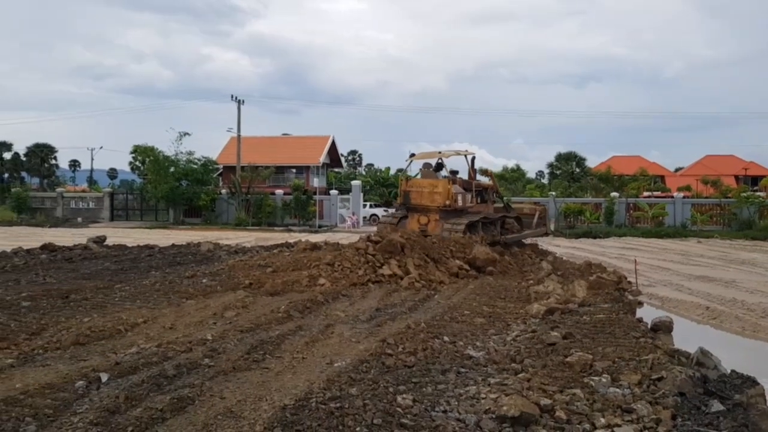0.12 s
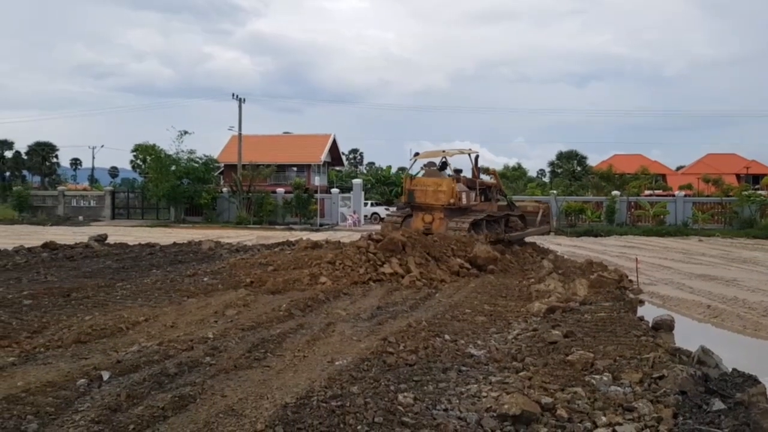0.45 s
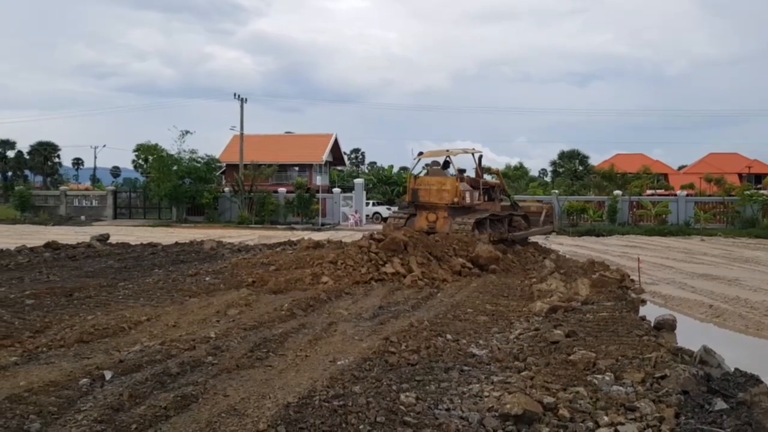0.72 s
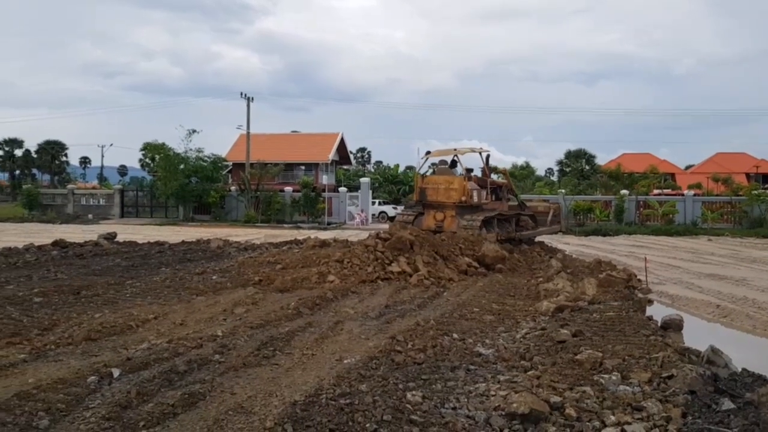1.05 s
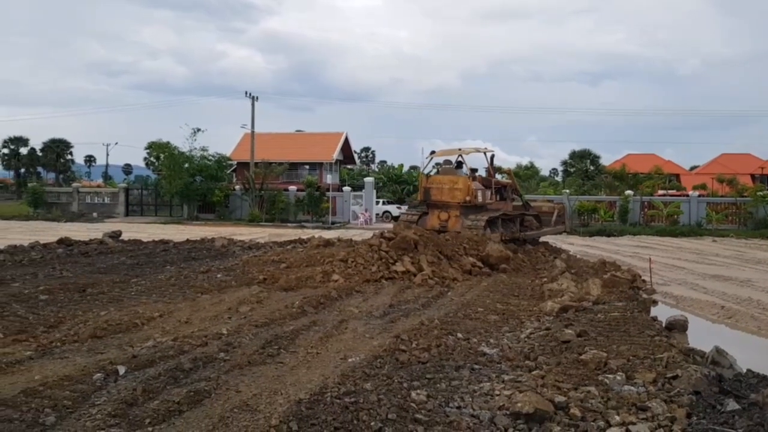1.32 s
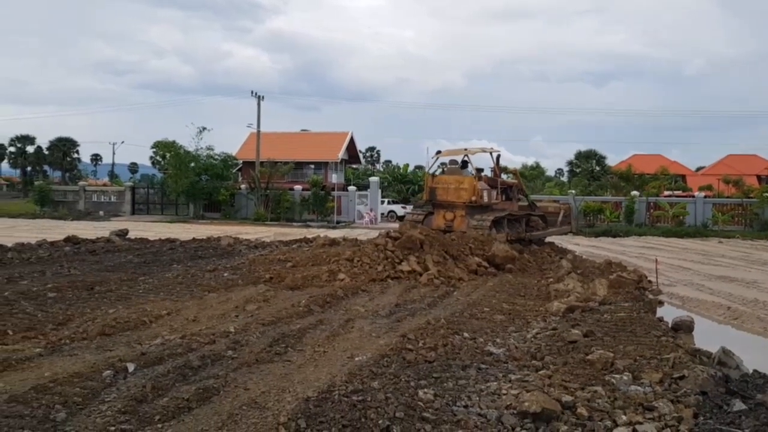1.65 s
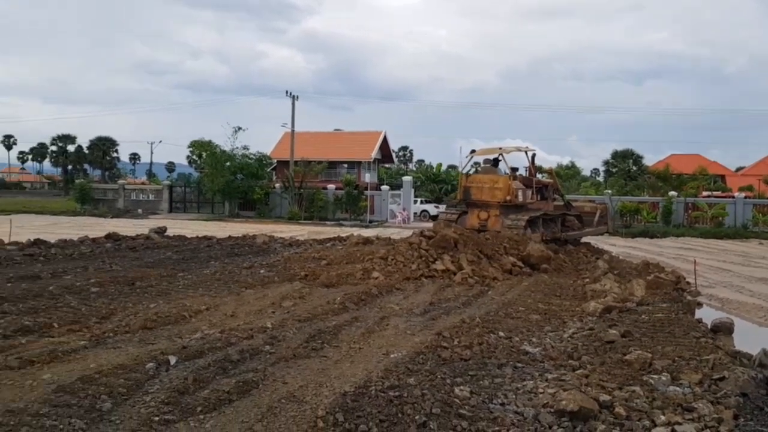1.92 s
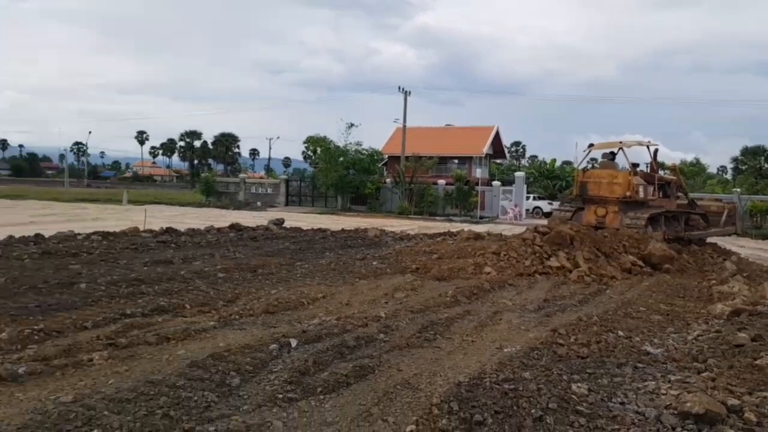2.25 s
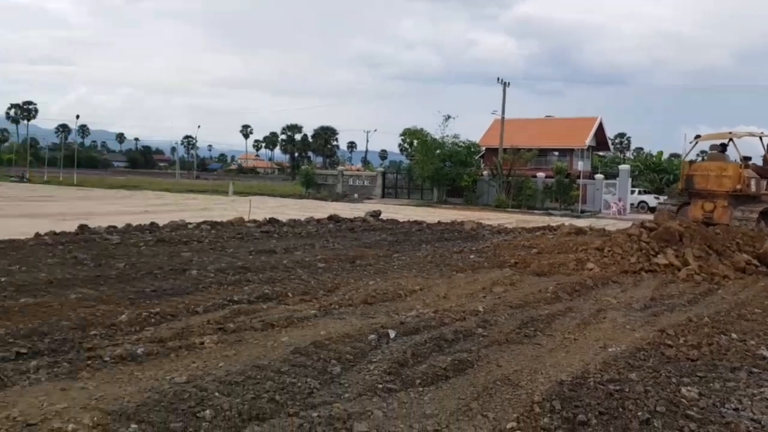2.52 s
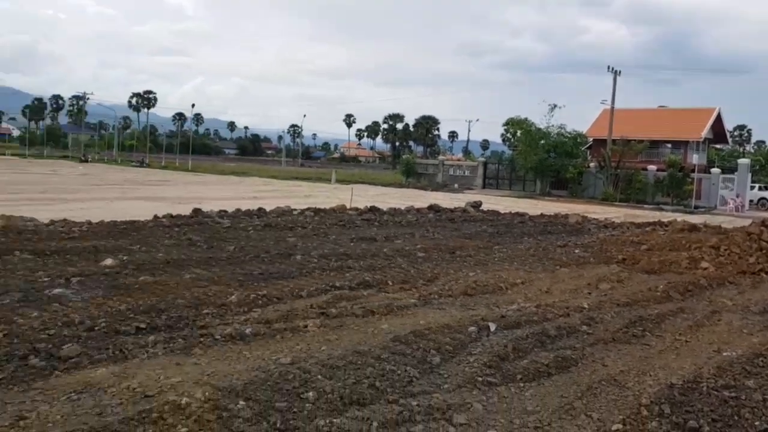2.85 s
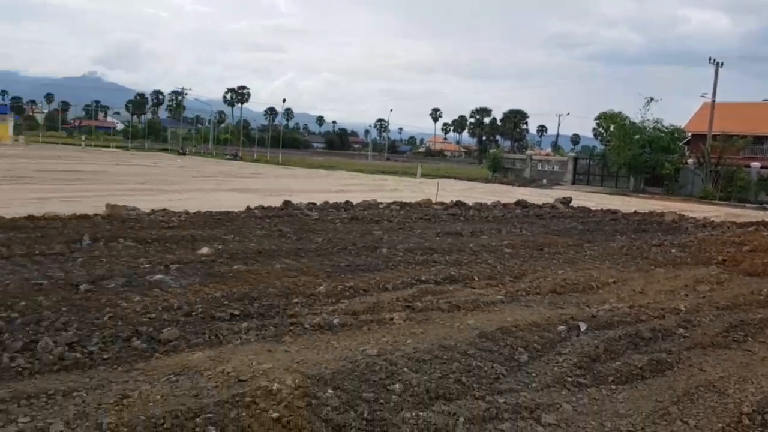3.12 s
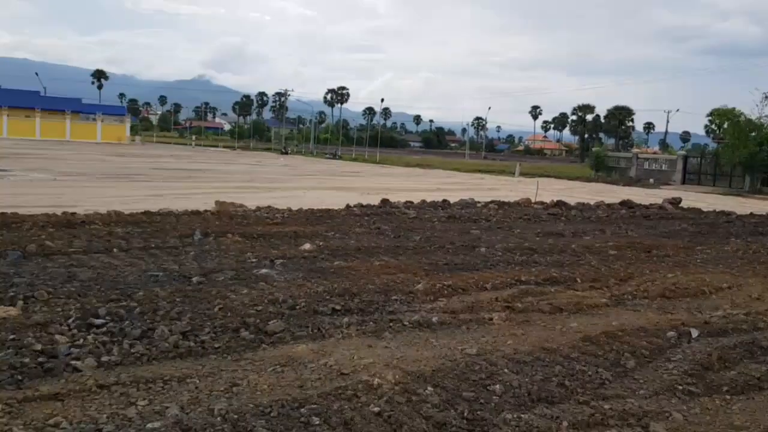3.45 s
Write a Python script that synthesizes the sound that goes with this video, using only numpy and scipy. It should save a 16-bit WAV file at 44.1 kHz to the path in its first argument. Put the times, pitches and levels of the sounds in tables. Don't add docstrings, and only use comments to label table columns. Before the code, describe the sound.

Steady low bulldozer engine throb with soft earth thuds, then a deeper, harder-working note with gear whine, hiss and small metallic ticks. Outdoors, dry, heard by a phone turning away, the stereo image shifting.

```python
import sys
import numpy as np
from scipy import signal
from scipy.fft import rfft, irfft, next_fast_len
from scipy.io import wavfile
from scipy.ndimage import uniform_filter1d, map_coordinates

SR = 44100
rng = np.random.default_rng(int(sys.argv[2]) if len(sys.argv) > 2 else 0)


def transcribe(signal):
    frames = np.atleast_2d(signal).T
    limited = np.clip(frames, -1, 1)
    pcm = np.round(limited * 32767).astype(np.int16)
    wavfile.write(sys.argv[1], SR, pcm)


def how_loud(loudness_db):
    steps = np.asarray(loudness_db, float) / 20
    return 10 ** steps


N = 157878

# time_s, firing_rate_hz
FIRING_RATE = [(0, 81.4), (.09, 80.6), (2.08, 80.6), (2.22, 78.9), (2.37, 73.9), (2.45, 73.3), (2.8, 72.9),
               (2.95, 73.4), (3.15, 76.6), (3.28, 77.3), (3.58, 77.2)]
# time_s, level_db
FUEL = [(0, -23), (.5, -26), (2.1, -24), (2.26, -22), (2.37, -17.5), (2.5, -17), (2.78, -18), (2.95, -16.5),
        (3.08, -20.5), (3.14, -24.5), (3.19, -21.5), (3.3, -24), (3.36, -18.5), (3.42, -21.5), (3.455, -28),
        (3.5, -21), (3.58, -21)]
# time_s, left_port_lag_ms
LEFT_LAG = [(0, 0.072), (.9, 0.078), (1.7, 0.091), (2.1, 0.14), (2.5, 0.25), (2.9, 0.34), (3.58, 0.41)]
# time_s, gain_db
RANGE_GAIN = [(0, 1), (.3, 2), (.8, 0.9), (1.4, -0.2), (2.1, 0.3), (2.5, 0.9), (3, 0.64), (3.58, -0.5)]
CYLINDER_EXCESS = [0.2, -0.4, -0.67, 0.48, 0.12, -0.2]
# cycle_order, level_db
EXHAUST_PIPE = [(1, -55), (3, -29), (4, -7), (5, 4.5), (6, 0), (7, -4.5), (11, -12.5), (12, -32),
                (14, -34.5), (30, -39)]
# cycle_order, facing_db, turned_db
GEAR_LINES = [(24.69, -51, -51.5), (50.16, -57.5, -48), (59.15, -55, -50), (70.56, -54.5, -58.5),
              (79.9, -54, -64)]
# freq_hz, level_db
ROAR_FACING = [(22, -31), (40, 1), (110, -5.5), (200, -6), (370, -8), (520, -5), (1200, -13.5),
               (1800, -12.5), (9000, -21.5)]
# freq_hz, level_db
ROAR_TURNED = [(22, -22), (40, 0), (110, 1.5), (200, -7.5), (330, -4.5), (800, -7.5), (1500, -13),
               (2400, -9.5), (4000, -20.5), (9000, -17.5)]
# centre_hz, width_hz, gain_db
PANELS_FACING = [(530, 53, 3), (1045, 200, 3.5), (1590, 150, 0.5), (1790, 69, -9.5), (1980, 46, 3),
                 (2160, 68, -6), (2410, 36, 6.5), (2598, 122, -7), (2740, 42, 3), (4640, 140, 3.5)]
# centre_hz, width_hz, gain_db
PANELS_TURNED = [(580, 62, 3), (1500, 120, 1), (2000, 71, -3.5), (2410, 180, -0.5), (2620, 73, -0.5),
                 (2990, 130, -1.5), (4020, 110, 0), (7780, 280, 0)]
# time_s, whistle_hz, level_db, hiss_share
TURBO_WHISTLE = [(0, 7030, -45, 0.33), (.5, 6790, -43, 0.11), (1.2, 6450, -45.5, 0.11),
                 (2.25, 6330, -47, 0.28), (2.4, 6790, -37.5, 1), (2.65, 7330, -44, .95),
                 (2.9, 7360, -41, .95), (3.2, 6940, -48, 0.83), (3.58, 6850, -71, .95)]
# freq_hz, level_db
CLATTER_SPECTRUM = [(1500, -30), (3000, -4), (5000, -1.5), (7000, -9), (9000, -2), (12000, 2), (15000, 1)]
TAPPET_LEVELS = [-7, -1, -7, 2, -7, -1]
# time_s, low_hz, low_db, high_hz, high_db
DRIVE_WHINES = [(2.3, 2100, -66, 2640, -62), (2.52, 2150, -55, 2720, -50), (2.8, 2220, -54, 2800, -47.5),
                (3.02, 2260, -54, 2870, -48.5), (3.12, 2280, -51, 3000, -52),
                (3.32, 2293, -45.5, 3050, -52), (3.58, 2293, -46, 3060, -52)]
# start_s, length_s, pitch_hz, level_db, fall_per_overtone_db
PIN_SQUEAKS = [(1.93, 0.14, 3590, -46, 25), (2.036, .02, 3250, -42, 25), (2.203, 0.014, 2350, -49, 25),
               (2.25, 0.012, 6400, -39.5, 25), (2.488, .015, 5000, -46, 37), (2.505, 0.013, 7150, -41, 25),
               (2.513, .012, 6700, -42, 25), (2.596, .012, 6580, -42, 29), (2.676, .012, 6400, -48, 22),
               (2.845, 0.011, 6250, -46, 33), (2.911, 0.025, 2410, -38.5, 25),
               (2.912, 0.036, 5170, -40.5, 0), (2.912, 0.025, 7440, -34, 25),
               (2.913, 0.028, 12400, -30, 25), (2.917, 0.11, 3550, -46.5, 23),
               (3.037, 0.026, 2414, -48, 25), (3.11, 0.034, 2980, -39.5, 8), (3.113, .02, 11600, -41, 25),
               (3.112, 0.024, 5800, -49, 25), (3.105, .02, 14700, -34, 25), (3.14, 0.024, 7420, -36, 25),
               (3.14, .02, 15620, -29, 25), (3.225, 0.22, 766, -43, 25), (3.298, 0.02, 5200, -36, -2.5),
               (3.297, .025, 15620, -31, 25)]
# start_s, hold_s, level_db, t60_s
LINK_CLANKS = [(0.335, 0.0067, -30, 0.073), (1.16, .012, -48, .06), (2.33, .004, -46, .02),
               (2.415, .004, -44, .02), (2.437, .004, -43, .02), (2.6, 0.0046, -39, .02),
               (2.685, .005, -44, .02), (2.77, .004, -42, .02), (2.85, .005, -42, .02),
               (2.912, 0.0089, -40, .03), (2.928, 0.014, -40, 0.061), (3.093, 0.032, -46, .04),
               (3.131, 0.028, -46, 0.072), (3.296, .012, -45, 0.068), (3.418, 0.015, -43, .05)]
# freq_hz, level_db
LINK_SPECTRUM = [(1500, -14), (4300, -2), (4900, 9), (6500, 10), (8500, 11), (11000, 13.5), (13500, 14.5),
                 (15700, 7.5)]
# start_s, pitch_hz,
# level_db
THUDS = [(.03, 292.3, -37), (.06, 470, -39), (.12, 538, -46), (.31, 260, -41.5), (.34, 520, -49),
         (.64, 260, -44), (.65, 530, -40), (.78, 500, -45), (1.009, 560, -37), (1.3, 551, -40.5),
         (1.61, 471, -44), (2.27, 277.6, -37), (2.41, 530, -38), (2.44, 471, -42), (2.5, 575, -38),
         (2.62, 139, -42), (2.66, 506, -45), (2.75, 570, -40.5), (2.96, 304.6, -46), (3.06, 300, -34),
         (3.109, 244.3, -35), (3.21, 116.3, -39), (3.27, 325.7, -40.5), (3.37, 230, -37),
         (3.44, 248, -40), (3.48, 319, -38)]
# freq_hz, correlation
LIKENESS = [(150, 1), (900, 0.92), (1600, 0.83), (3000, 0.55), (7000, 0.61), (12000, 0.18)]
# freq_hz, gain_db
RIGHT_PORT = [(6800, 0.5), (7400, -3.5), (8150, -17.5), (9300, -18.5), (11500, -15.5), (13000, -17.5),
              (14500, -27.5), (15600, -23)]
# freq_hz, gain_db
LEFT_OVER_RIGHT = [(400, 0), (700, -.5), (1400, 3), (2400, -3), (3500, -8), (7000, -13), (8500, -3),
                   (12000, -4)]
# freq_hz, level_db
SELF_NOISE = [(30, -106), (1000, -105), (8000, -116), (11500, -110), (15500, -120)]

IDLE_DB = -27.5
TOP_HZ = 15860


def unit(x):
    return x / np.sqrt(np.mean(x ** 2) + 1e-20)


def along(points, hz):
    f, v = np.transpose(points)
    return np.interp(np.log(hz + 1e-3), np.log(f), v)


def curves(rows):
    s, *cols = np.transpose(rows)
    return [np.interp(np.arange(N) / SR, s, c) for c in cols]


def wobble(rate_hz):
    return unit(map_coordinates(rng.standard_normal(N // 4), [np.arange(N) * rate_hz / SR]))


def filtered(x, response):
    m = next_fast_len(N + 8192)
    return irfft(rfft(x, m) * response(np.fft.rfftfreq(m, 1 / SR)), m)[..., :N]


def pair(spectrum):
    def mid_side_gain(hz):
        angle = np.arccos(np.clip(along(LIKENESS, hz), -1, 1)) / 2
        return how_loud(along(spectrum, hz)) * [np.cos(angle), np.sin(angle)]

    mid, side = filtered(rng.standard_normal((2, N)), mid_side_gain)
    return unit(np.array([mid + side, mid - side]))


def fuzzy(hz, wide_hz):
    phase = 2 * np.pi * np.cumsum(hz * np.ones(N)) / SR
    return wobble(wide_hz) * np.cos(phase) + wobble(wide_hz) * np.sin(phase)


def held(start_s, hold_s, t60_s):
    t = np.arange(N) / SR - start_s
    return np.clip(t / 0.0025, 0, 1) * how_loud(-60 * np.clip(t - hold_s, 0, 9) / t60_s)


def soil():
    rise_s, wide_hz = 0.035, 38
    out = 0
    for start_s, pitch_hz, level_db in THUDS:
        rises = np.clip((np.arange(N) / SR - start_s) / rise_s, 0, 50)
        swell = rises * np.exp(1 - rises)
        out = out + how_loud(level_db) * swell * fuzzy(pitch_hz, wide_hz)
    return out


def squeaks():
    pitch_jitter, roughness = 0.004, 0.5
    out = 0
    for start_s, length_s, pitch_hz, level_db, fall_db in PIN_SQUEAKS:
        phase = 2 * np.pi * np.cumsum(pitch_hz * (1 + pitch_jitter * wobble(200))) / SR
        rough = 1 + roughness * wobble(pitch_hz / 14)
        stack = 0
        for k in range(6):
            if (k + 1) * pitch_hz < TOP_HZ:
                stack = stack + how_loud(-fall_db * k) * np.sin((k + 1) * phase)
        out = out + how_loud(level_db + 3.5) * held(start_s, length_s, 0.06) * rough * stack
    return out


def clanks():
    burst = sum(how_loud(db) * held(start_s, hold_s, t60_s) for start_s, hold_s, db, t60_s in LINK_CLANKS)
    return burst * how_loud(2.5 * wobble(300)) * pair(LINK_SPECTRUM) * 5


def drive_whine(hz, wide_hz):
    tone = np.sqrt(2) * np.sin(2 * np.pi * np.cumsum(hz + 6 * wobble(30)) / SR)
    return tone + 0.45 * fuzzy(hz, wide_hz)


def drive():
    low_hz, low_db, high_hz, high_db = curves(DRIVE_WHINES)
    low = how_loud(low_db) * drive_whine(low_hz, wide_hz=60)
    return low + how_loud(high_db) * drive_whine(high_hz, wide_hz=45)


def gears(cycle, turned):
    out = 0
    for order, facing_db, turned_db in GEAR_LINES:
        level_db = facing_db + (turned_db - facing_db) * turned ** 3 + 3.75 * wobble(12)
        line = np.sin(2 * np.pi * order * cycle + 0.65 * wobble(15))
        out = out + np.sqrt(2) * how_loud(level_db) * line
    return out


def turbo():
    hz, level_db, share = curves(TURBO_WHISTLE)
    share = np.clip(share, 0, 1)
    whistle = np.sqrt(1 - share) * fuzzy(hz, wide_hz=260)
    hiss = np.sqrt(share) * fuzzy(hz, wide_hz=1700)
    return how_loud(level_db) * (whistle + hiss)


def clatter(cycle, fuel_db):
    level_db, growth_db_per_db, t60_s = -56.5, 2.06, 0.018
    late_firings, scatter_db, wash = 0.6, 2.5, 0.28
    firing = 6 * (cycle + 1) - late_firings
    size_db = np.tile(TAPPET_LEVELS, 70) + scatter_db * rng.standard_normal(420)
    since_tick_s = firing % 1 / 78
    ticks = wash + how_loud(size_db[firing.astype(int)] - 60 * since_tick_s / t60_s)
    effort_db = uniform_filter1d(fuel_db, size=6000) - IDLE_DB
    return how_loud(level_db + growth_db_per_db * effort_db) * unit(ticks * pair(CLATTER_SPECTRUM))


def panels(x, bumps):
    def gain(hz):
        return how_loud(sum(db * np.exp(-0.5 * ((hz - centre) / wide) ** 2) for centre, wide, db in bumps))

    return unit(filtered(x, gain))


def strands(x):
    depth_db, corner_hz = 1.6, 6000
    hz, _, z = signal.stft(x, SR, nperseg=4096, noverlap=3584)
    field = uniform_filter1d(rng.standard_normal(z.shape[1:]), size=2, axis=0)
    field = unit(uniform_filter1d(field, size=10, axis=1))
    depth = depth_db / (1 + (hz[:, None] / corner_hz) ** 2)
    _, y = signal.istft(z * how_loud(depth * field), SR, nperseg=4096, noverlap=3584)
    return unit(y[:, :N])


def roar(cycle, turned):
    gate = 1 + 0.11 * np.cos(12 * np.pi * cycle) + 0.07 * np.cos(2 * np.pi * cycle) + 0.04 * wobble(8)
    share = turned ** 1.3
    facing = how_loud(-33) * strands(panels(pair(ROAR_FACING), PANELS_FACING))
    away = how_loud(-29.5) * strands(panels(pair(ROAR_TURNED), PANELS_TURNED))
    return gate * (np.sqrt(1 - share) * facing + np.sqrt(share) * away)


def exhaust(cycle, fuel_db):
    orders = np.arange(1, 25)
    imbalance = np.fft.fft(CYLINDER_EXCESS)[orders % 6] / 6
    out = 0
    for order, share in zip(orders, imbalance):
        if order % 6 == 0:
            size = how_loud(fuel_db + 0.34 * wobble(19))
        else:
            size = share * how_loud(IDLE_DB + 0.68 * wobble(4.5))
        wave = np.real(size * np.exp(2j * np.pi * order * cycle))
        out = out + np.sqrt(2) * how_loud(along(EXHAUST_PIPE, order)) * wave
    return out


def scene():
    (rate_hz,), (fuel_db,), (lag_ms,) = curves(FIRING_RATE), curves(FUEL), curves(LEFT_LAG)
    (range_db,) = curves(RANGE_GAIN)
    cycle = 0.01 + np.cumsum(rate_hz) / 6 / SR
    turned = np.clip((lag_ms - 0.1) / 0.28, 0, 1)
    machine = soil() + squeaks() + clanks() + drive() + gears(cycle, turned) + turbo()
    machine = machine + how_loud(range_db) * (clatter(cycle, fuel_db) + roar(cycle, turned))
    machine = machine + exhaust(cycle, fuel_db)
    heard_at = np.arange(N) - lag_ms * SR / 1000
    late = map_coordinates(machine[0], [heard_at], order=5, mode="nearest")
    return np.array([late, machine[1]])


def roll_off(x):
    return signal.sosfilt(signal.butter(12, 15860, fs=SR, output="sos"), x)


def record(dry):
    def port_gain(hz):
        return how_loud(along(RIGHT_PORT, hz) + along(LEFT_OVER_RIGHT, hz) * [[1], [0]])

    def noise_gain(hz):
        return how_loud(along(SELF_NOISE, hz)) * np.sqrt(SR / 2)

    ports = filtered(dry, port_gain)
    hiss = filtered(rng.standard_normal((2, N)), noise_gain)
    mix = filtered(ports + hiss, lambda hz: hz < TOP_HZ)
    return roll_off(mix)


dry = scene()
out = record(dry)
transcribe(out)
```